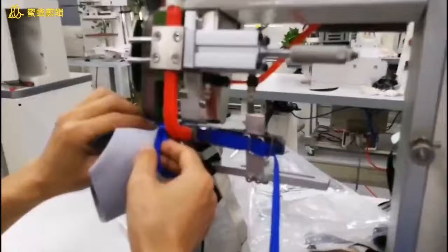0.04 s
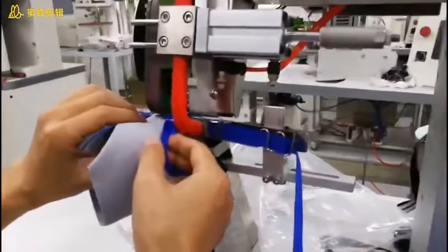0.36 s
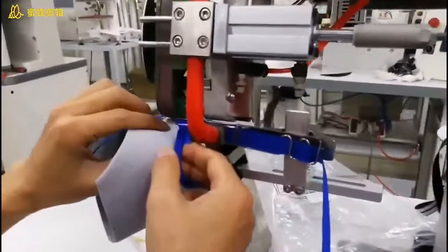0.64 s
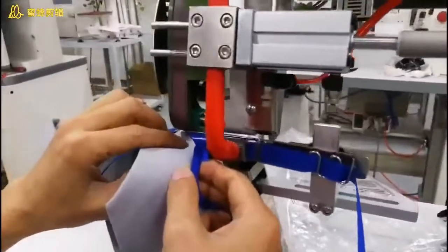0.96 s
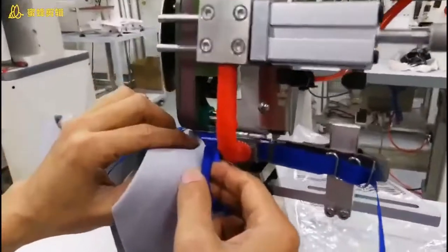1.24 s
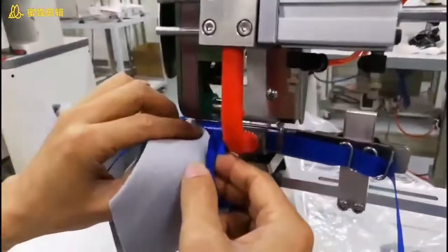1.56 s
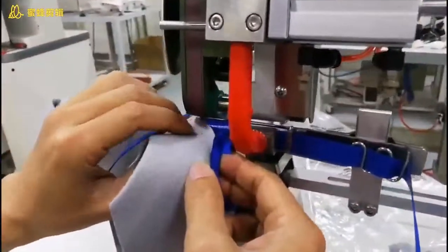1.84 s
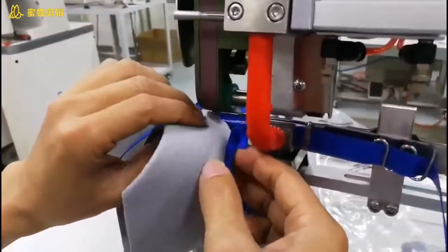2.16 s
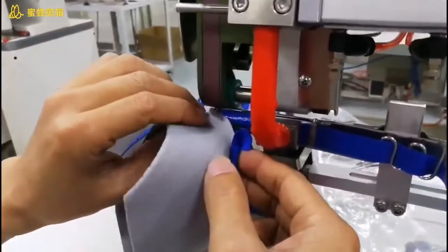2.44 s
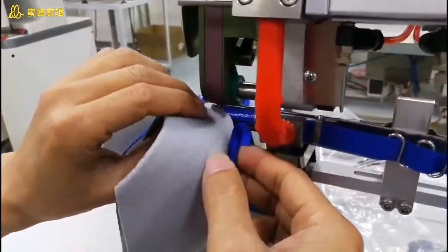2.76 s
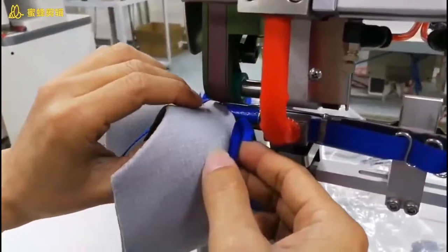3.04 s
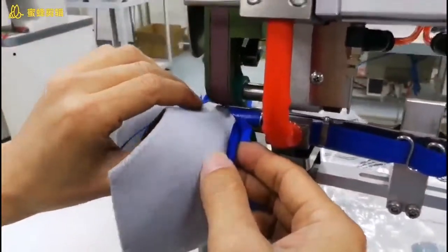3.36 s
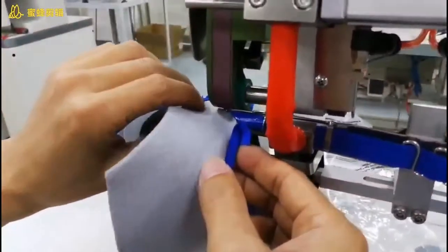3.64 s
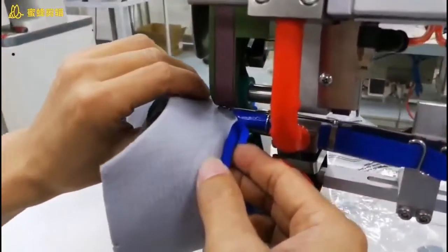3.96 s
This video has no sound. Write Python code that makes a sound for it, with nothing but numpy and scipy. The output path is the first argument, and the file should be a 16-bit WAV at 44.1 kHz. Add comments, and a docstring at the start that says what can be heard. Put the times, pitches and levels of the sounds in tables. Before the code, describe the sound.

A machine's nozzle blows a continuous, rushing hiss of hot air onto tape and fabric, fluttering slightly with brief hints of a whistle. A hand-held stereo microphone drifts nearer, over faint workshop fan rumble and motor hum.

```python
"""A hot-air nozzle hisses steadily onto tape and fabric in a seam-sealing machine.
Its turbulent jet flutters and spits a little, rings in the duct and flares briefly into a whistle.
A hand-held stereo microphone drifts closer, so bands of the hiss swell and fade in each ear
and reflections from the metal parts slide. Underneath, the workshop's fans rumble,
the blower drones and motors hum faintly."""
import sys
import numpy as np
from scipy import signal
from scipy.fft import rfft, irfft, next_fast_len
from scipy.io import wavfile
from scipy.ndimage import uniform_filter1d, map_coordinates

SR = 44100
rng = np.random.default_rng(int(sys.argv[2]) if len(sys.argv) > 2 else 0)


def transcribe(signal):
    """Save signal, clipped to [-1, 1], as a 16-bit WAV file at the path in sys.argv[1]."""
    frames = np.atleast_2d(signal).T
    limited = np.clip(frames, -1, 1)
    pcm = np.round(limited * 32767).astype(np.int16)
    wavfile.write(sys.argv[1], SR, pcm)


N = 176400

# tone colour of the jet at each ear: freq_hz, gain_db
JET_EQ_LEFT = [(300, -73), (600, -45.5), (780, -40.5), (990, -31), (1160, -30), (1590, -37.5), (1720, -26),
               (1850, -27), (2110, -34), (2330, -26), (2630, -30), (2890, -28), (3100, -28.5), (3230, -31),
               (3750, -24), (4050, -24), (4180, -30.5), (4310, -23), (4610, -25), (4870, -25.5),
               (5210, -31), (5550, -24), (5790, -20.5), (6200, -31), (6590, -29.5), (6760, -36),
               (7110, -34.5), (7670, -39), (8140, -40.5), (8570, -28.5), (9000, -42.5), (9690, -31.5),
               (11200, -47), (11970, -36), (13650, -49.5), (14100, -56), (15200, -70)]
JET_EQ_RIGHT = [(300, -72), (600, -50.5), (780, -45.5), (1160, -34.5), (1290, -34), (1550, -22.5),
                (1680, -25.5), (1860, -17.5), (2280, -17.5), (2630, -18.5), (2760, -23), (3100, -27),
                (3400, -24), (3620, -25), (3790, -22.5), (4130, -29), (4310, -26.5), (4480, -23.5),
                (4650, -25), (5170, -32.5), (5400, -36), (5810, -28), (6160, -35), (6370, -24.5),
                (6850, -25.5), (7110, -19.5), (7280, -20.5), (7620, -35.5), (8350, -38.5), (8530, -34.5),
                (9130, -36), (9650, -36.5), (11150, -46.5), (12050, -41.5), (13200, -58), (13700, -58),
                (14100, -65), (15200, -71)]
# narrow resonances of the nozzle and its duct: freq_hz, half_width_hz, boost_db
DUCT_RINGS = [(887, 11, 5), (1475, 30, 3.5), (1834, 27, 3), (3550, 9.7, 1.5), (5890, 84, 2)]
# how alike the hiss is in the two ears: freq_hz, coherence
JET_COHERENCE = [(550, .2), (1200, 0.83), (1800, 0.77), (2050, 0.55), (2500, 0.93), (2950, 0.42),
                 (3300, 0.84), (3700, 0.51), (4400, 0.96), (4850, 0.5), (5300, 0.83), (5900, 0.43),
                 (6450, 0.87), (7300, 1), (8400, 0.8), (9700, 0.95), (10700, 0.64), (13000, .4)]
# level ride as the microphone closes in: time_s, gain_db
APPROACH_RIDE = [(.1, -1.8), (.5, -1), (1.35, -1), (2.2, 1.07), (2.8, 1.6), (3.4, 1.5), (4, 1.66)]
# turbulence of the jet: rate_hz, depth_db
JET_FLUTTER = [(8, -0.19), (35, 0.7), (130, 0.3)]
# brief surges of the jet: start_s, boost_db, decay_s
JET_SPITS = [(2.368, 2, 0.0086), (2.590, 3.5, 0.016), (2.819, 3, 0.0093), (3.26, 4.5, 0.0046)]
# bands that swell or fade as the microphone passes: peak_s, half_length_s, freq_hz, half_width_hz, gain_db
PASSING_BANDS_LEFT = [(.29, .51, 1100, 171, -8), (.58, 0.19, 4600, 100, 9.5), (1.58, 0.75, 3370, 181, 16),
                      (1.6, 0.21, 4870, 290, 9), (1.62, 0.89, 2490, 297, 11),
                      (1.77, .67, 4800, 1270, -12.5), (2.03, 1, 6630, 1180, 12),
                      (3.07, 0.46, 8660, 1030, -7), (3.6, 0.35, 5650, 90, -2)]
PASSING_BANDS_RIGHT = [(0, 1, 10500, 700, 9), (.48, 0.42, 3040, 202, 8), (.9, 0.094, 2650, 129, -1),
                       (1.2, 1, 1900, 150, -0.5), (1.35, .28, 4620, 139, 8.5), (2.05, 0.34, 4470, 170, 4.5),
                       (2.5, 0.3, 6760, 170, 3), (2.89, 0.76, 7170, 130, -7),
                       (3.82, 0.79, 7640, 960, -12.5)]
# hollows where direct and reflected sound cancel: deepest_s, half_length_s, freq_hz, gain_db
HOLLOWS_LEFT = [(.41, .31, 4380, -4), (.45, .46, 2270, -14), (.78, 0.63, 3120, -19),
                (1.17, 0.28, 5150, -11), (3.03, 0.74, 3630, -18)]
HOLLOWS_RIGHT = [(.4, 0.23, 5090, -16), (.6, 0.47, 2040, -7), (.77, 0.22, 3160, -10.5),
                 (1.45, .6, 3870, -10.5), (3.24, 3.2, 1550, -11.5)]
# flares of the nozzle's whistle: peak_s, half_length_s, pitch_hz, boost_db
WHISTLE_FLARES = [(.58, .025, 4650, 4), (0.747, .03, 4800, 6), (2.917, 0.029, 5830, 2.5),
                  (3.66, 0.034, 5700, 2)]
# phase lead of the left ear over the right: freq_hz, lead_rad
LEFT_LEAD = [(600, .64), (1450, 0.64), (1900, 0.48), (2100, 2.72), (2800, 2.18), (3300, 2.64), (3650, 4.2),
             (3950, 5.1), (4650, 6.2), (5000, 8.45), (5400, 7.8), (5700, 13), (6200, 12.5)]
# tone colour of the fan rumble: freq_hz, gain_db
RUMBLE_EQ = [(15, -48), (30, -41.5), (62, -41), (90, -40), (160, -42), (310, -41.5), (420, -45.5),
             (550, -48), (900, -56.5), (2500, -90)]
# stereo width of the rumble: freq_hz, side_over_mid_db
RUMBLE_SPREAD = [(150, -24.5), (330, -25), (450, -1.5), (560, 0)]
# level ride of the blower's drone: time_s, level_db
BLOWER_RIDE = [(.1, -70), (.22, -58), (.4, -66.5), (.68, -63), (.81, -58), (.96, -70), (1.08, -64),
               (1.27, -60), (1.42, -67), (2.15, -64), (2.6, -70), (2.9, -65), (3.2, -71), (3.57, -67),
               (3.9, -64)]
# hum of the motors: pitch_hz, level_db, waver_db
MOTOR_TONES = [(132.4, -83, 10), (200.3, -73.5, 4), (365, -72, -2)]


def amp(db):
    """Decibels to gain."""
    return 10 ** (np.asarray(db) / 20)


def along(points, hz):
    """Read a curve of (freq_hz, value) points on a log frequency axis."""
    freqs, values = np.transpose(points)
    return np.interp(np.log(hz + 1), np.log(freqs + 1), values)


def bell(x, centre, width):
    """A smooth bump of height 1."""
    return np.exp(-.5 * ((x - centre) / width) ** 2)


def wobble(rate_hz):
    """A smooth random curve through rate_hz points a second."""
    return map_coordinates(rng.standard_normal(2048), [np.arange(N) * rate_hz / SR], mode="wrap")


def filtered(x, response):
    """Equalise x with a gain given as a function of frequency."""
    size = next_fast_len(N + SR // 2)
    return irfft(rfft(x, size) * response(np.fft.rfftfreq(size, 1 / SR)), size)[..., :N]


def nozzle_hiss():
    """Rushing air, partly alike in the two ears, coloured by the duct and the parts around it."""
    def width(hz):
        angle = np.arccos(np.clip(along(JET_COHERENCE, hz), 0, 1)) / 2
        return np.array([np.cos(angle), np.sin(angle)])

    def colour(hz):
        ring_db = sum(db * bell(hz, freq, half_width) for freq, half_width, db in DUCT_RINGS)
        return amp([along(JET_EQ_LEFT, hz) + ring_db, along(JET_EQ_RIGHT, hz) + ring_db])

    mid, side = filtered(rng.standard_normal((2, N)), width)
    return filtered(np.array([mid + side, mid - side]), colour)


def metal_reflections(hiss, count=6, gain=0.086, near_s=.0035, far_s=.012, stretch_per_s=0.04):
    """Weak echoes off the metal parts fall further behind the direct hiss as the microphone nears."""
    n = np.arange(N)
    delays_s = np.geomspace(near_s, far_s, count) * rng.uniform(.9, 1.1, count)
    mix = hiss.copy()
    for delay_s, polarity in zip(delays_s, rng.choice([-1, 1], count)):
        read_at = n - delay_s * SR * np.exp(stretch_per_s * n / SR)
        mix += polarity * gain * np.array([map_coordinates(ear, [read_at], order=3) for ear in hiss])
    return mix / np.sqrt(1 + count * gain ** 2)


def passing_bands_db(bands, hz, t):
    """Bands of hiss swell or fade in one ear as the microphone moves past."""
    return sum(db * bell(hz, freq, half_width) * bell(t, peak_s, half_length)
               for peak_s, half_length, freq, half_width, db in bands)


def hollows_db(hollows, hz, t, half_width_hz=108, sink_per_s=0.046):
    """Reflections cancel the direct sound in notches that sink as the reflected paths lengthen."""
    cut_db = 0
    for deepest_s, half_length, freq, db in hollows:
        centre_hz = freq * np.exp(-sink_per_s * (t - deepest_s))
        cut_db += db * bell(t, deepest_s, half_length) * bell(hz, centre_hz, half_width_hz)
    return cut_db


def whistle_db(hz, t, half_width_hz=110):
    """The nozzle's whistle flares as a brief, narrow lift in the hiss."""
    return sum(db * bell(hz, pitch, half_width_hz) * bell(t, peak_s, half_length)
               for peak_s, half_length, pitch, db in WHISTLE_FLARES)


def drifting_colour(hiss, frame=1024, shimmer_db=1.11, lead_anchor_s=3.35, lead_sink_per_s=0.024):
    """Swells, hollows, whistle and shimmer shape the hiss; the phase pattern between the ears sinks."""
    freqs, t, spectrum = signal.stft(hiss, SR, nperseg=frame)
    hz = freqs[:, None]
    ears = [(PASSING_BANDS_LEFT, HOLLOWS_LEFT), (PASSING_BANDS_RIGHT, HOLLOWS_RIGHT)]
    ear_db = np.array([passing_bands_db(bands, hz, t) + hollows_db(dips, hz, t) for bands, dips in ears])
    # each band wavers on its own: noise smoothed over frequency, then time
    shimmer = uniform_filter1d(rng.standard_normal(spectrum.shape[1:]), size=14, axis=0)
    shimmer = uniform_filter1d(shimmer, size=8, axis=1)
    gain = amp(ear_db + whistle_db(hz, t) + shimmer_db * shimmer / shimmer.std())
    lead_rad = along(LEFT_LEAD, hz * np.exp(lead_sink_per_s * (t - lead_anchor_s)))
    phase_shift = np.exp(.5j * np.array([lead_rad, -lead_rad]))
    return signal.istft(spectrum * gain * phase_shift, SR, nperseg=frame)[1][:, :N]


def air_jet():
    """The turbulent jet flutters, spits and grows a little louder as the microphone closes in."""
    t = np.arange(N) / SR
    ride_db = np.interp(t, *np.transpose(APPROACH_RIDE))
    flutter_db = sum(depth_db * wobble(rate_hz) for rate_hz, depth_db in JET_FLUTTER)
    spit_db = sum(db * (t >= start_s) * np.exp(-np.abs(t - start_s) / decay_s)
                  for start_s, db, decay_s in JET_SPITS)
    hiss = drifting_colour(metal_reflections(nozzle_hiss()))
    return amp(ride_db + flutter_db + spit_db) * hiss


def fan_rumble():
    """Workshop fans lay down a low bed of noise, centred in the bass and wide above it."""
    def colour(hz):
        mid_db = along(RUMBLE_EQ, hz)
        return amp([mid_db, mid_db + along(RUMBLE_SPREAD, hz)])

    mid, side = filtered(rng.standard_normal((2, N)), colour)
    return np.array([mid + side, mid - side])


def blower_and_motors(blower_hz=62, blower_waver_db=1):
    """The blower's low drone and the motors' hum: pure tones that waver in level and phase."""
    t = np.arange(N) / SR
    blower = (blower_hz, np.interp(t, *np.transpose(BLOWER_RIDE)), blower_waver_db)
    hum = np.zeros(N)
    for pitch_hz, level_db, waver_db in [blower, *MOTOR_TONES]:
        rms = amp(level_db + waver_db * wobble(6.82))
        phase = 2 * np.pi * pitch_hz * t + 0.97 * wobble(6.5)
        hum += np.sqrt(2) * rms * np.sin(phase)
    return hum


def scene():
    """The jet up front, over the workshop's rumble and hum."""
    return air_jet() + fan_rumble() + blower_and_motors()


def record(dry, start_s=.072, fade_s=.001, top_hz=15500):
    """The sound cuts in abruptly, with the very top of the treble shaved off."""
    fade_in = np.clip((np.arange(N) / SR - start_s) / fade_s, 0, 1)
    return filtered(dry * fade_in, lambda hz: hz < top_hz)


dry = scene()
out = record(dry)
transcribe(out)
```